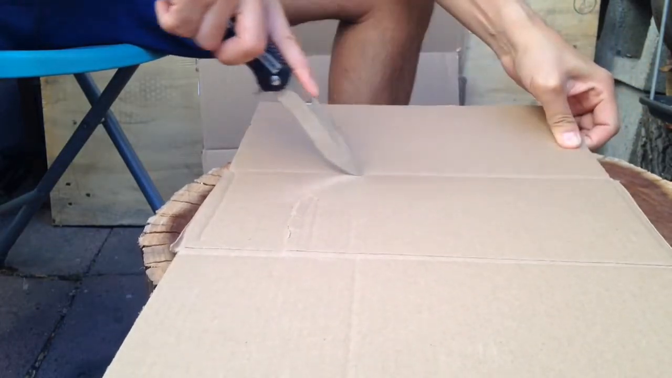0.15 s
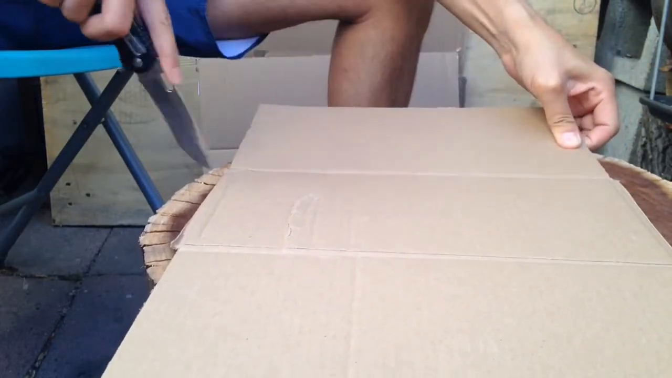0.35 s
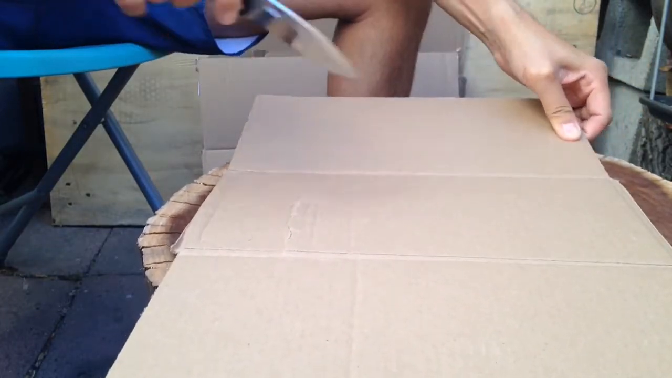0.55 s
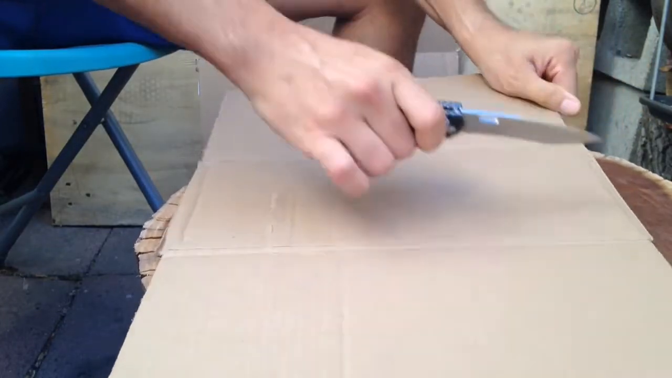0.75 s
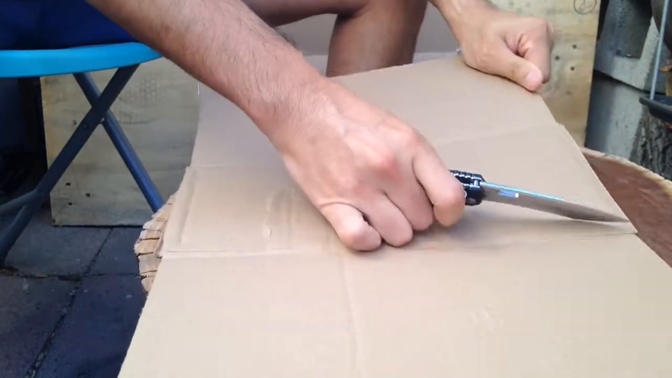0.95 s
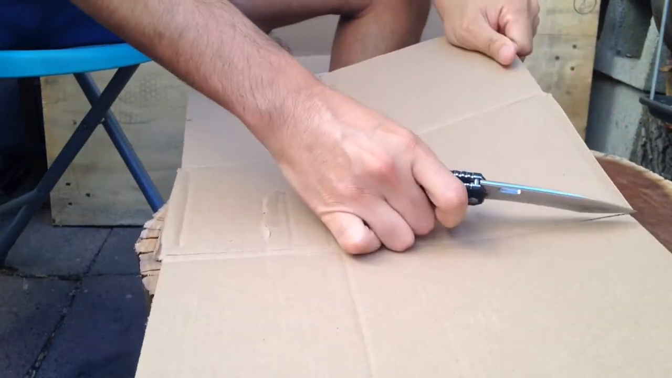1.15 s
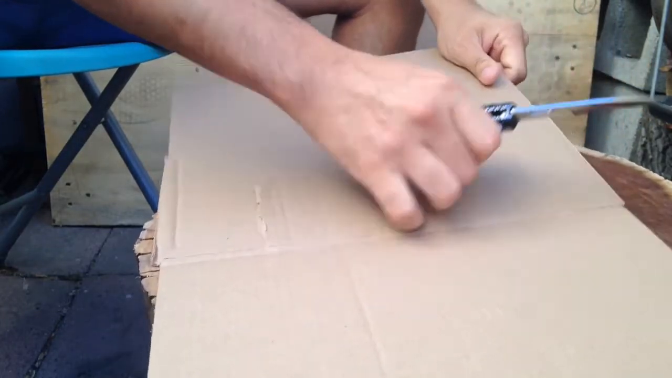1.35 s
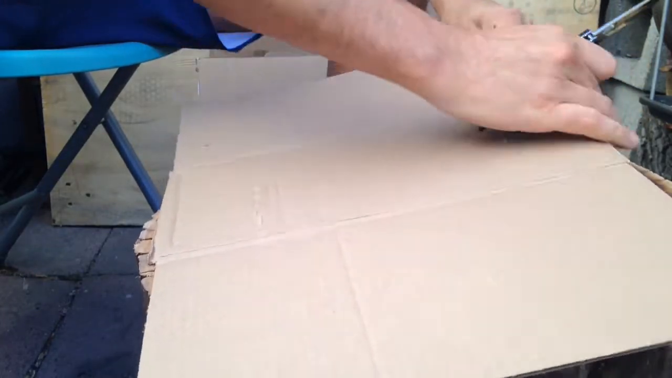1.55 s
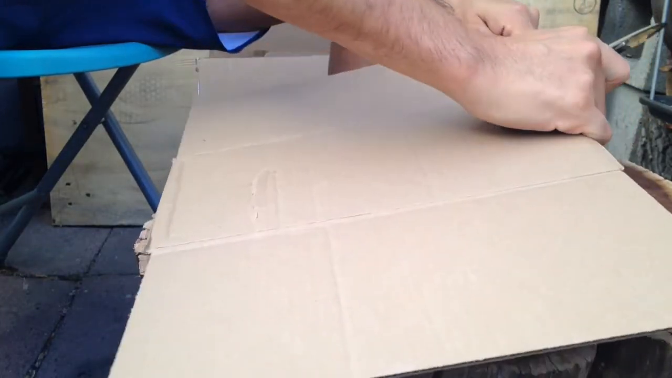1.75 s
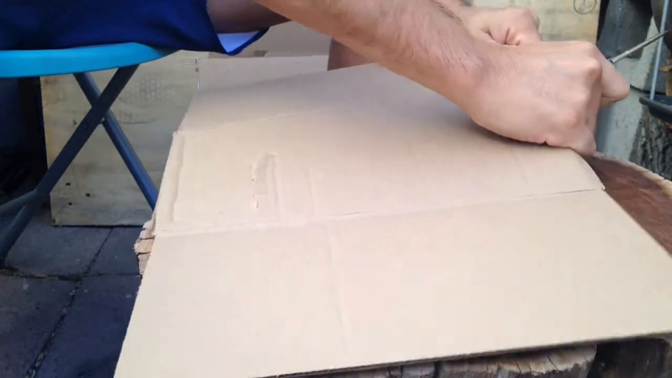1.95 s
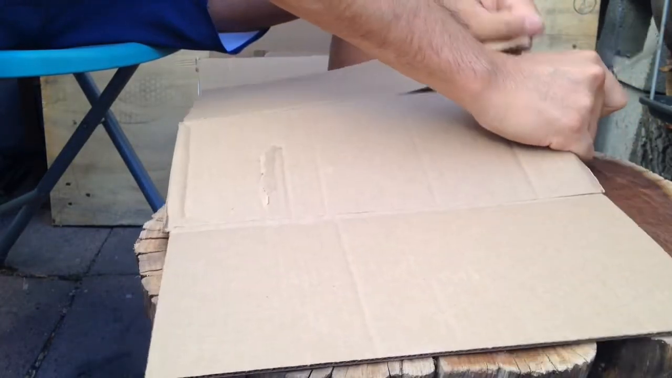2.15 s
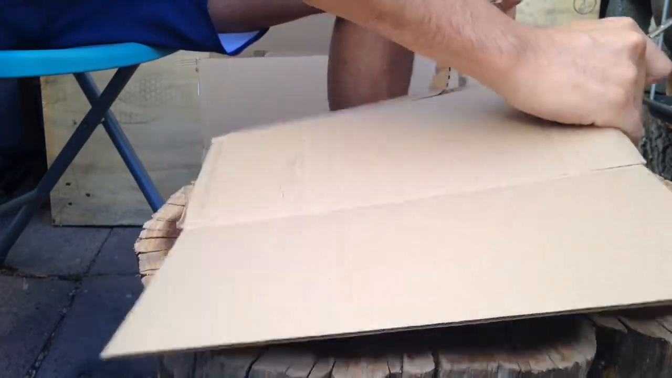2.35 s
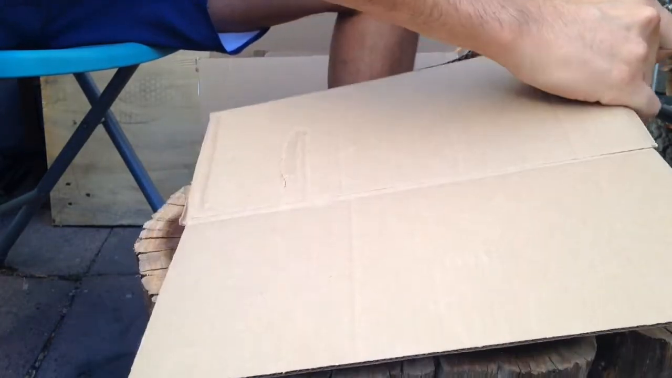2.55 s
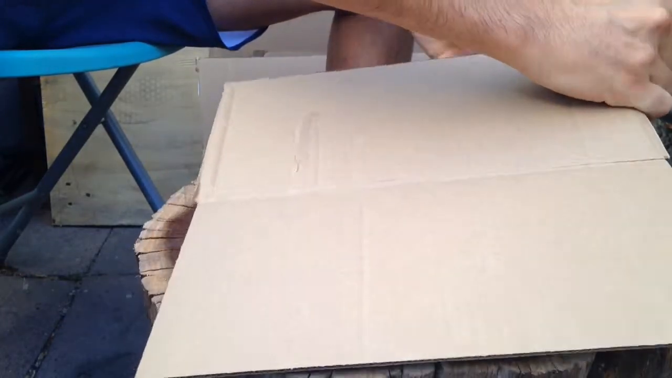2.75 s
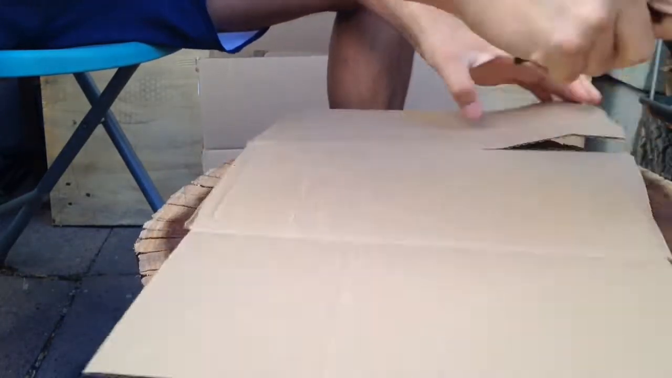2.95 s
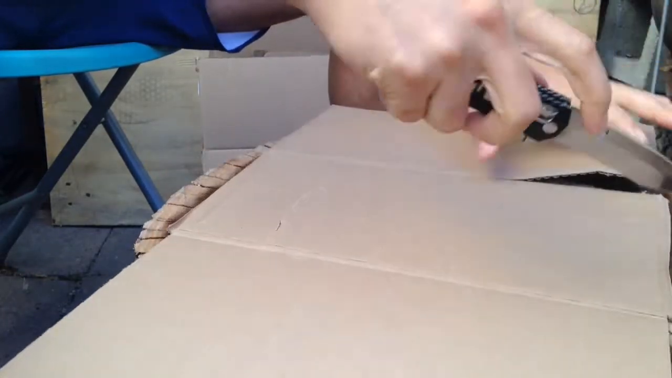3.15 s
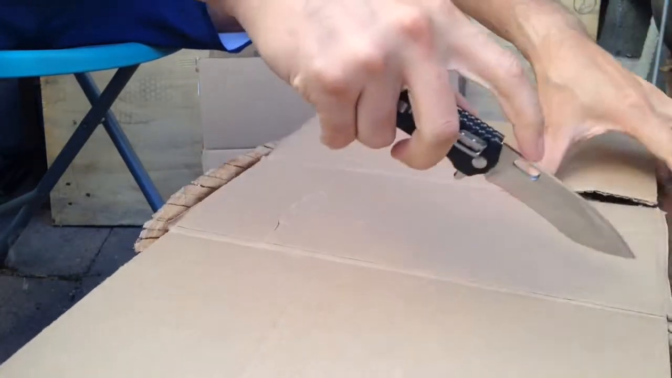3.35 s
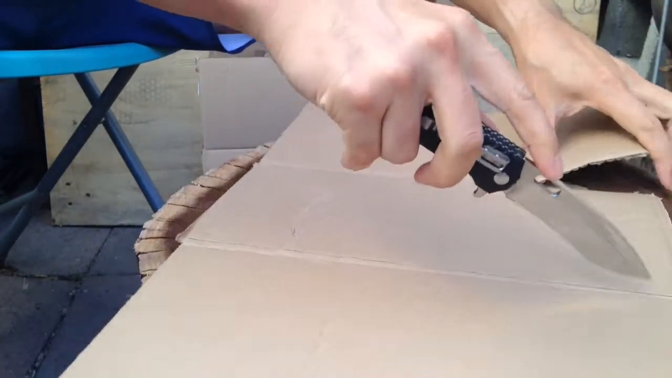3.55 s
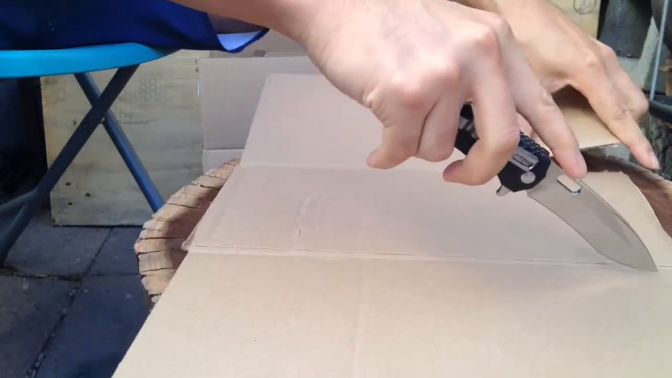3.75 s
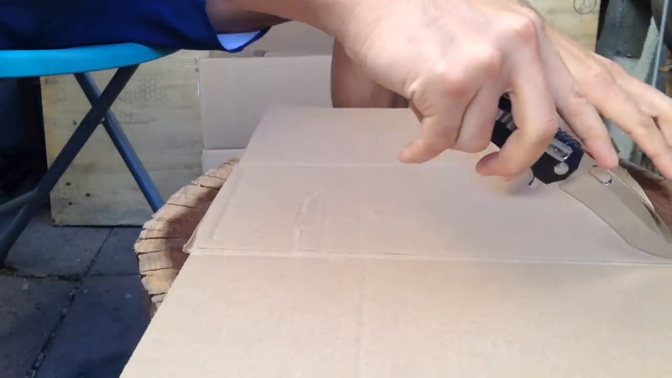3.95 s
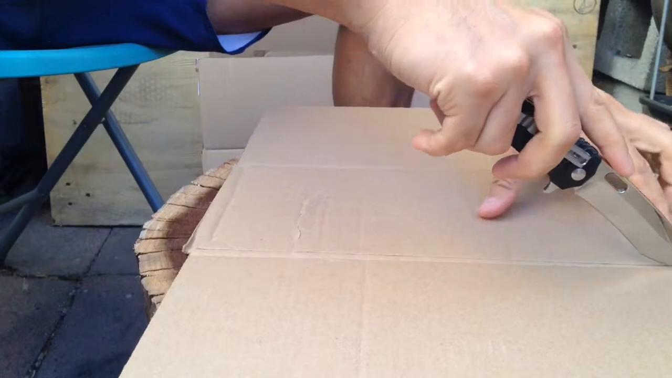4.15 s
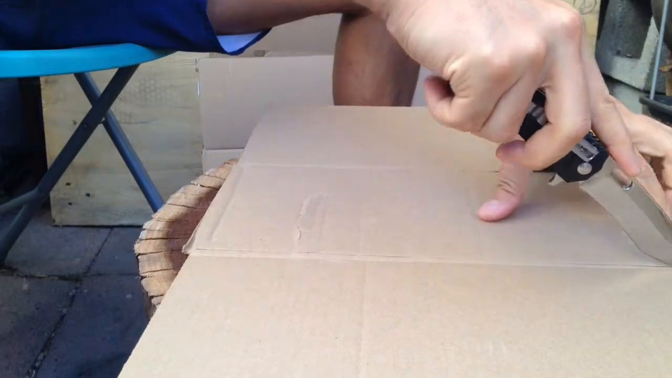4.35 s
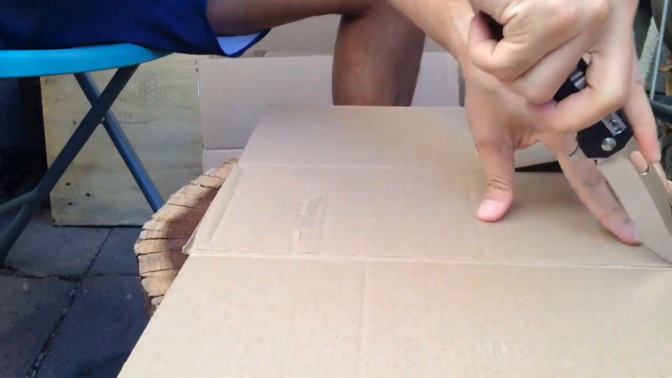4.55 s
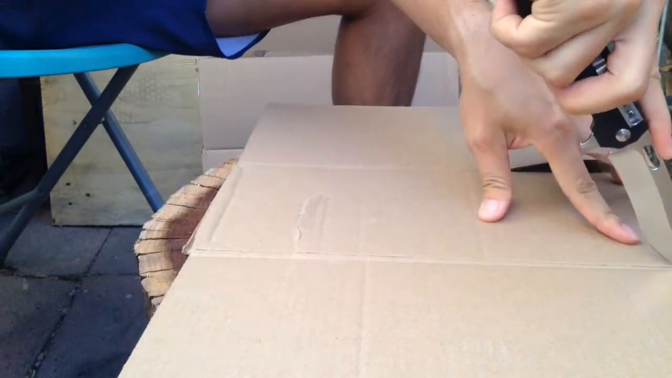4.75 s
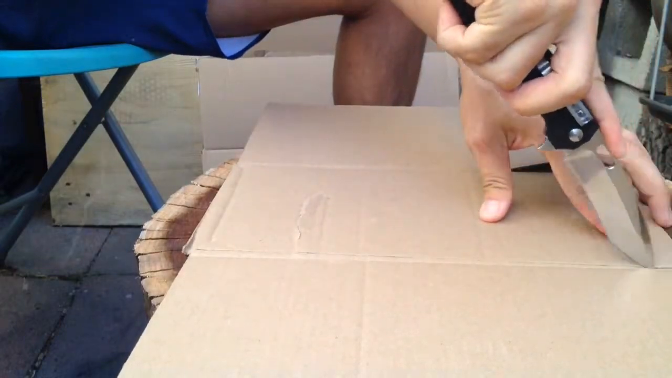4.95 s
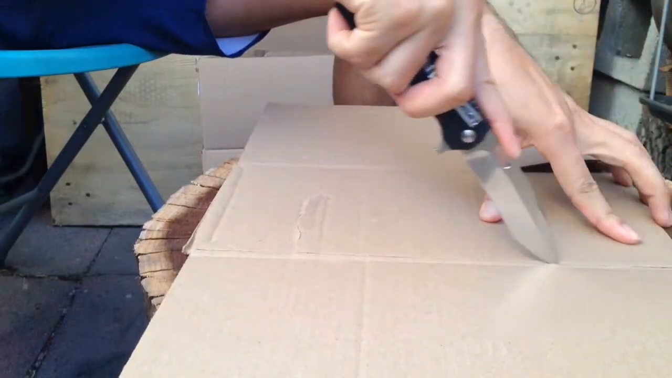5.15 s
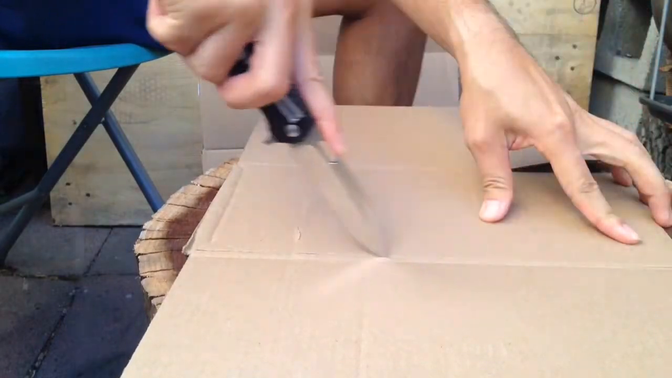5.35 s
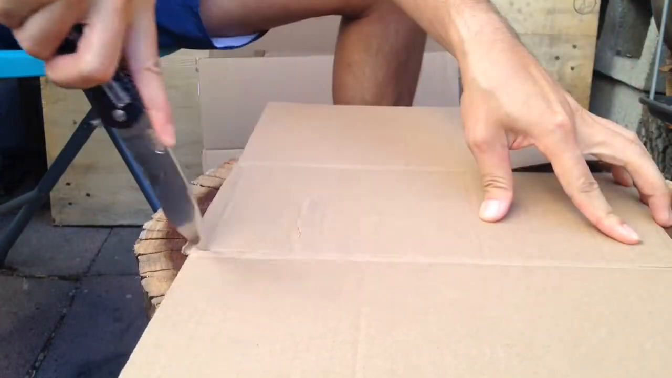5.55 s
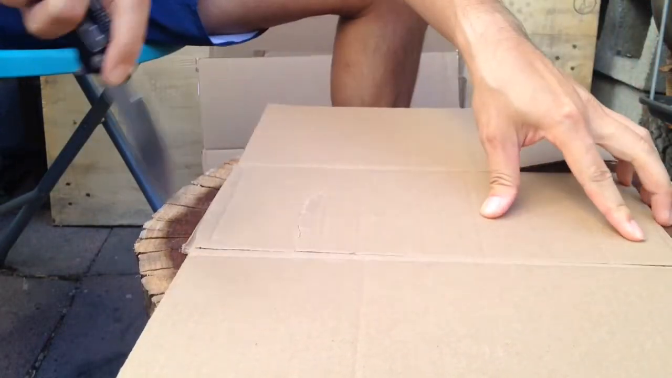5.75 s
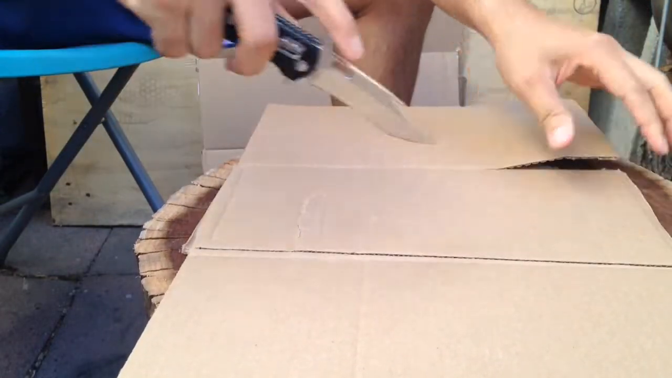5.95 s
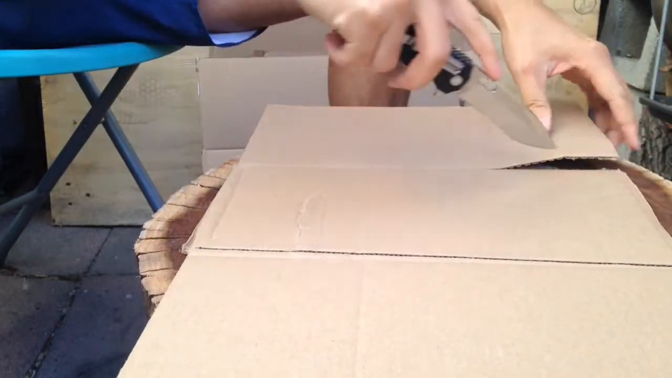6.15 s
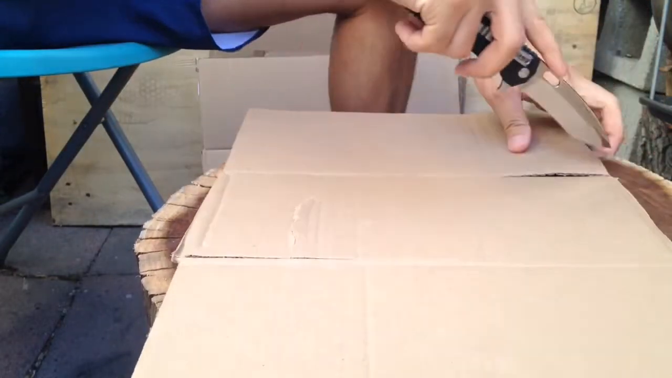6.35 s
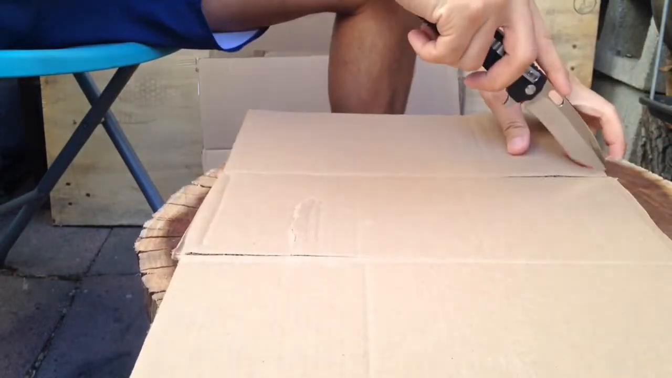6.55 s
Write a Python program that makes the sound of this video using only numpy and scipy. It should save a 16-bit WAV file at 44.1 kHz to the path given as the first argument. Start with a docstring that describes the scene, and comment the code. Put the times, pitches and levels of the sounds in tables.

```python
"""A knife scores a sheet of corrugated cardboard on a stump outdoors; hands bend, tear and shift the sheet.
Breaking fibres are random pulses that drive a coarse crackle, a fine fizz and the ringing modes of the sheet.
Snaps, knocks and sharp dry cracks stand out of the rubbing, and the sheet bumps on the stump with dull thuds.
Underneath, distant traffic is a low rumble of filtered noise that drifts in lumps."""
import sys
import numpy as np
from scipy import signal
from scipy.io import wavfile
from scipy.ndimage import uniform_filter1d

SR = 44100
rng = np.random.default_rng(int(sys.argv[2]) if len(sys.argv) > 2 else 0)


def wav_out(sig):
    """Save sig, one row per channel (or a flat mono array), as 16-bit PCM at SR to the path in sys.argv[1]."""
    wavfile.write(sys.argv[1], SR, np.round(np.clip(np.atleast_2d(sig).T, -1, 1) * 32767).astype(np.int16))


N = 295470

# resonant modes of the sheet: (frequency [Hz], bandwidth [Hz], relative level [dB])
BOARD = [(250, 100, 7.5), (349.4, 73, 3), (458, 81, 0), (673, 129, 2.5), (835, 158, 3.5), (1170, 300, 6.5),
         (1680, 57, 3.5)]
# modes favoured by the spot being rubbed: (time [s], centre frequency [Hz], spread [octaves])
SPOT = [(0, 600, .8), (.45, 660, .8), (2.3, 464, .7), (4.2, 400, .6), (5.1, 570, .4), (5.7, 530, .45),
        (6.28, 700, 1.1), (6.37, 870, .25)]


def gain_of(db):
    """Decibels to amplitude."""
    return 10 ** (np.asarray(db) / 20)


def evened(x):
    """Scales to rms 1."""
    return x / np.sqrt(np.mean(x ** 2) + 1e-20)


def slow_noise(span):
    """Noise smoothed twice over span samples, at rms 1: a random drift."""
    once = uniform_filter1d(rng.standard_normal(N), span)
    return evened(uniform_filter1d(once, span))


def causal(points, size=4096):
    """Minimum-phase response of unit energy, its spectrum drawn through (frequency [Hz], level [dB]) points."""
    f, db = np.transpose(points)
    hz = abs(np.fft.fftfreq(size, 1 / SR))
    level_db = np.interp(np.log(hz + 1), np.log(f + 1), db, left=-60, right=-60)
    log_gain = np.log(gain_of(level_db))
    # the Hilbert transform of the log gain gives the minimum phase
    spectrum = np.exp(np.conj(signal.hilbert(log_gain)))
    taps = np.fft.ifft(spectrum).real[:size // 2]
    return taps / np.linalg.norm(taps)


def cardboard():
    """Rubbing and snaps drive three answers: coarse crackle, fine fizz and the ringing sheet."""
    # colour of the crackle: (frequency [Hz], relative level per Hz [dB])
    crackle_colour = [(800, 3.5), (1700, 6.5), (2500, 4.5), (4000, 3.5), (5600, -4), (6800, -16),
                      (9000, -19.5)]
    # colour of the fizz: (frequency [Hz], relative level per Hz [dB])
    fizz_colour = [(2000, -58.5), (4800, -13.5), (7000, -14), (9300, -9.5), (11500, -12.5), (14700, -11.5),
                   (16000, -24)]
    snap_edge = 0.69  # 0-1: how much of a crack's low end is taken away

    coarse = fibres(per_s=1200, spread_db=4.0, clump_db=2.2, clump_s=.005, smooth=1.05)
    fine = fibres(per_s=5000, spread_db=4.5, clump_db=1.3, clump_s=.012, smooth=1.2)
    # the edge catches on the flutes
    catches = fibres(per_s=140, spread_db=2.5, clump_db=1.5, clump_s=0.031, smooth=0.97)
    fizz_gain, crackle_gain, shake_gain = rubbing()
    crack, spit, *thumps = snaps()

    # a sudden break is brighter than rubbing
    sharp = signal.lfilter([1, -snap_edge], [.5], crack)
    crackle = coarse * crackle_gain + sharp
    crackle = patches(crackle, ring_t60=.03, direct=1.4, patches_per_s=35, count=16)

    # coarse breaks throw fizz at the same moments
    spray = coarse * rng.choice([-1., 1.], N)
    fizz = evened(fine + 1.3 * spray) * fizz_gain + spit
    fizz = patches(fizz, ring_t60=.004, direct=2.4, patches_per_s=9, count=16)

    shaking = catches * shake_gain * favour(*rubbed_spot()) + thumps
    bright = signal.oaconvolve(crackle, causal(crackle_colour)) + signal.oaconvolve(fizz, causal(fizz_colour))
    return bright[:N] + board(shaking) + cracks() + bumps()


def rubbing():
    """Gains of fizz, crackle and shaking: each slide grips, swells or fades, and lets go; the cuts add theirs."""
    # the two long knife cuts, one list each: (time [s], fizz of fine fibres [dB],
    # crackle of coarse fibres [dB], shaking of the board [dB])
    cuts = [
        [(0.0, -38.5, -43, -45), (0.242, -35, -41, -41), (0.266, -39.5, -43, -35.5), (0.334, -29.5, -30, -28.5),
         (0.386, -42.5, -48.5, -41), (0.396, -36.5, -38.5, -32), (0.425, -60, -52, -32.5),
         (0.5, -105, -98, -85)],
        [(4.92, -77, -93, -69), (4.962, -49.5, -64.5, -58.5), (5.244, -47, -46.5, -43.5),
         (5.264, -44, -46, -37), (5.518, -36, -35, -34.5), (5.626, -41, -40, -32.5), (5.712, -50.5, -44, -39),
         (5.79, -99, -94, -72)],
    ]
    # hands and blade slide, bend and tear: (start [s], length [s], swell from start to end [dB],
    # fizz at the start [dB], crackle at the start [dB], shaking at the start [dB])
    slides = [(0.432, 5.05, 3, -72, -67.5, -63), (0.572, 0.14, 17.5, -64.5, -61, -67),
              (0.65, 0.2, -10, -43.5, -47.5, -69), (0.872, 0.061, 0.5, -45, -42.5, -35.5),
              (0.94, 0.57, -11, -58.5, -55, -58), (1.128, 0.037, -4, -50.5, -39, -47.5),
              (1.178, 0.085, -4, -55, -53.5, -57), (1.328, 0.091, -7.5, -47.5, -51.5, -57),
              (1.642, 0.083, 5.5, -55.5, -59.5, -55.5), (1.694, 0.031, 8.5, -51.5, -46.5, -55),
              (1.771, 0.13, 5, -51, -51, -53), (1.952, 0.083, 2, -38.5, -40, -39.5),
              (2.064, 0.16, 4, -53, -51.5, -51), (2.241, 0.1, -7, -30.5, -32, -28),
              (2.373, 0.058, -1.5, -40, -40.5, -60), (2.504, 0.095, -6, -61.5, -61.5, -82),
              (2.755, 0.074, 6.5, -56, -54, -45), (2.945, 0.051, 8.5, -52, -50, -39.5),
              (3.023, 0.011, 5, -40.5, -37, -42.5), (3.082, 0.067, -12.5, -40.5, -36, -34.5),
              (3.276, 0.17, -15, -51.5, -54.5, -44), (3.431, 0.17, 3.5, -47.5, -47, -47),
              (3.666, 0.2, -22.5, -39.5, -42, -42.5), (4.285, 0.029, -5, -57, -63, -47),
              (4.408, 0.039, 2, -65, -84, -55), (4.135, 1.5, 0, -77, -66, -74),
              (4.832, 0.0057, 4.5, -54.5, -67, -57), (5.796, 0.13, 15, -69.5, -72, -83),
              (6.283, 0.099, 5.5, -44, -43.5, -40.5)]
    grip_db_per_s, release_db_per_s = 950, 545.5  # rise ahead of the start, fall after the end
    swell_bend = 1.83  # above 1: the swell or fade comes late in the slide

    t = np.arange(0, N / SR + .002, .001)
    start, length, swell_db, *levels_db = np.transpose(slides)[:, :, None]
    into = t - start
    swelling = swell_db * np.clip(into / length, 0, 1) ** swell_bend
    gripping = grip_db_per_s * np.minimum(into, 0)
    releasing = -release_db_per_s * np.maximum(into - length, 0)
    shape_db = swelling + gripping + releasing
    # overlapping slides add in power
    gains = np.sqrt([np.sum(gain_of(db + shape_db) ** 2, axis=0) for db in levels_db])
    for s, *cut_db in map(np.transpose, cuts):
        gains = gains + [gain_of(np.interp(t, s, db, left=-120, right=-120)) for db in cut_db]
    return [np.interp(np.arange(N) / SR, t, gain) for gain in gains]


def fibres(per_s, spread_db, clump_db, clump_s, smooth):
    """Fibres break at random with uneven strength, in clumps as the edge sticks and slips, over smooth sliding."""
    breaks = rng.random(N) < per_s / SR
    strength = gain_of(spread_db * np.minimum(rng.exponential(1, N), 4))
    pulses = breaks * strength * rng.choice([-1., 1.], N)
    clumps = slow_noise(max(int(clump_s * SR), 2))
    drive = evened(pulses) + smooth * rng.standard_normal(N)
    return evened(drive * gain_of(clump_db * clumps))


def snaps():
    """Each snap or knock is a tick and a dying burst of breaks; rows: crackle, fizz, then one for each mode."""
    # fibres snap: (time [s], crack [dB], fizz [dB], t60 of crack and fizz [s])
    snap_rows = [(0.088, -34, -33, 0.048), (0.191, -30.5, -34, 0.088), (0.247, -29, -29, 0.066),
                 (0.7675, -37.5, -32, 0.057), (0.795, -34, -30.5, 0.014), (1.715, -38, -33.5, 0.05),
                 (1.837, -39, -35.5, 0.032), (2.2152, -13.5, -18.5, 0.037), (2.2226, -23, -23, 0.026),
                 (2.2286, -13.5, -17.5, 0.071), (2.298, -21.5, -25.5, 0.11), (2.3093, -24.5, -26, 0.05),
                 (2.35, -29, -33.5, 0.035), (3.047, -31, -42, 0.015), (4.0233, -49, -39, 0.012),
                 (4.0354, -66, -54, 0.01), (4.0436, -65, -59, 0.01), (4.074, -51, -57, 0.016),
                 (4.109, -58, -56, 0.012), (4.146, -55, -48, 0.025), (4.583, -55, -54, 0.018),
                 (5.0778, -38, -41.5, 0.067), (5.115, -34.5, -42, 0.034), (5.2061, -31, -30.5, 0.017),
                 (5.3972, -23, -28.5, 0.018), (5.4252, -29, -34, 0.038), (5.44, -31.5, -26.5, 0.03),
                 (5.5163, -40, -39, 0.021), (5.536, -41, -36, 0.018), (5.557, -31, -27, 0.035),
                 (5.642, -31, -32, 0.024), (5.672, -29, -33, 0.019), (6.479, -47, -45.5, 0.021)]
    # knocks on the sheet: (time [s], thump in the board [dB], crack [dB], t60 of the thump's drive [s],
    # modes favoured by the spot struck [Hz], their spread [octaves])
    knock_rows = [(0.395, -34, -32, 0.048, 647, 0.2), (0.8701, -30.5, -53, 0.032, 470, 1.23),
                  (0.915, -24.5, -35.5, 0.11, 570, 1.6), (1.039, -40.5, -45.5, 0.035, 530, 1.1),
                  (1.6902, -37.5, -59, 0.39, 880, 0.58), (1.962, -28.5, -35.5, 0.08, 910, 1.8),
                  (2.6934, -39.5, -57, 0.055, 366, 0.54), (2.7955, -27, -44, 0.2, 463, 0.79),
                  (2.9116, -34.5, -52, 0.48, 647, 0.34), (2.968, -21, -30.5, 0.041, 385, 0.39),
                  (3.272, -37.5, -49, 0.35, 664, 0.95), (3.2973, -22, -25, 0.12, 600, 0.95),
                  (3.4384, -27, -35, 0.073, 530, 1.16), (3.9428, -23, -36.5, 0.16, 634, 2.7),
                  (5.248, -31.5, -28.5, 0.044, 520, 0.44), (5.2814, -35.5, -53, 0.043, 530, 0.42),
                  (5.466, -33.5, -48, 0.025, 516, 0.56), (5.5795, -30, -27, 0.039, 493, 0.3),
                  (5.6161, -27.5, -31, 0.11, 520, 0.5), (5.705, -32, -35.5, 0.14, 1070, 0.88),
                  (6.428, -44, -46, 0.023, 785, 1.6)]
    snap_thump_db, knock_fizz_db = -12.5, -11.5  # both relative to the crack
    snap_octaves = 0.69  # spread of the modes that a snap shakes
    bright_share = 0.61  # crack and fizz die in this share of the thump's t60
    blow = 6.  # first blow of a thump over the first tick of the crack

    hits = []
    for s, crack_db, fizz_db, t60 in snap_rows:
        spot_hz = np.interp(s, *np.transpose(SPOT)[:2])
        hits.append((s, crack_db, crack_db + snap_thump_db, fizz_db, t60 / bright_share, spot_hz, snap_octaves))
    for s, thump_db, crack_db, *rest in knock_rows:
        hits.append((s, crack_db, thump_db, crack_db + knock_fizz_db, *rest))

    out, t = np.zeros((2 + len(BOARD), N)), np.arange(6000) / SR
    bursts = rng.standard_normal((len(hits), len(t)))
    bursts[:, 0] = 3.  # the tick
    # the drive of higher modes dies sooner; the third mode keeps the t60 as given
    hurry = np.sqrt(np.array(BOARD)[:, :1] / BOARD[2][0])
    for (s, crack_db, thump_db, fizz_db, t60, spot_hz, octaves), burst in zip(hits, bursts):
        fade_db = -60 * t / max(t60, .005)
        bright = gain_of([[crack_db], [fizz_db]]) * gain_of(fade_db / bright_share)
        thump = favour(spot_hz, octaves) * gain_of(thump_db + hurry * fade_db)
        thump[:, 0] *= blow
        part = out[:, round(s * SR):][:, :len(t)]
        part += (np.r_[bright, thump] * burst)[:, :part.shape[1]]
    return out


def patches(drive, ring_t60, direct, patches_per_s, count):
    """Each patch of the sheet rings in its own many small modes; the contact wanders over the patches."""
    t = np.arange(3000) / SR
    # noise that dies away stands for a crowd of small modes
    rings = rng.standard_normal((count, len(t))) * gain_of(-60 * t / ring_t60)
    rings /= np.linalg.norm(rings, axis=1, keepdims=True)
    rings[:, 0] += direct
    place = patches_per_s * np.arange(N) / SR
    out = np.zeros(N)
    for k, ring in enumerate(rings):
        # distance round the circle of patches, for an equal-power crossfade
        away = np.minimum(abs((place - k + count / 2) % count - count / 2), 1)
        touch = drive * np.cos(np.pi / 2 * away)
        out += signal.oaconvolve(touch, ring / np.linalg.norm(ring))[:N]
    return out


def rubbed_spot():
    """Favoured frequency [Hz] and spread [octaves] of the rubbed spot, which strays about its path."""
    wander_octaves, wander_s = .09, .03
    s, *spot = np.transpose(SPOT)
    spot_hz, octaves = (np.interp(np.arange(N) / SR, s, column) for column in spot)
    stray = slow_noise(int(wander_s * SR))
    return spot_hz * 2 ** (wander_octaves * stray), octaves


def favour(hz, octaves):
    """Share of a jolt that each mode takes: most for those near hz, neighbours in opposite phase; unit power."""
    far_share = .16  # left to distant modes
    modes = np.array(BOARD)
    distance = np.log2(modes[:, :1] / np.atleast_1d(hz)) / octaves
    share = gain_of(modes[:, 2:]) * (far_share + np.exp(-distance ** 2))
    share *= (-1) ** np.arange(len(modes))[:, None]
    return share / np.linalg.norm(share, axis=0)


def board(jolts):
    """Every mode of the sheet rings as a decaying sine from its own row of jolts."""
    t = np.arange(4096) / SR
    rings = np.array([np.exp(-np.pi * width * t) * np.sin(2 * np.pi * hz * t) for hz, width, _ in BOARD])
    rings /= np.linalg.norm(rings, axis=1, keepdims=True)
    return signal.oaconvolve(jolts, rings, axes=1)[:, :N].sum(axis=0)


def cracks():
    """Single dry cracks as a fold gives way: each a fast push of pressure and a slower pull back."""
    # (time [s], level [dB], time constant of the push [ms])
    crack_rows = [(.8716, -20, .06), (.8988, -24, .04), (.9133, -6, .065), (2.9674, -17, .09),
                  (3.2972, -8, .06), (3.4378, -15, .09), (3.9431, -10, .12), (3.951, -14, .16),
                  (3.9702, -23, .3), (5.2492, -20, .03), (.2062, -20, .03)]
    out = np.zeros(N)
    for s, db, push_ms in crack_rows:
        u = np.arange(400) / SR / (push_ms / 1000)
        out[round(s * SR):][:len(u)] -= gain_of(db) * u ** 2 * (3 - u) * np.exp(.5 - u)
    return out


def bumps():
    """The whole sheet bumps on the stump: dull low thuds, each a decaying sine with a softened start."""
    # (time [s], level [dB])
    bump_rows = [(0.84, -28), (1.874, -29.5), (2.214, -28), (2.301, -28.5), (3.942, -24.5)]
    stump_hz, stump_t60, onset_s = 137.5, 0.17, 0.0014
    t = np.arange(8000) / SR
    thud = np.sin(2 * np.pi * stump_hz * t) * gain_of(-60 * t / stump_t60) * (1 - np.exp(-t / onset_s))
    impulses = np.zeros(N)
    for s, db in bump_rows:
        impulses[round(s * SR)] = gain_of(db)
    return signal.oaconvolve(impulses, thud)[:N]


def traffic():
    """Distant low rumble: noise through a dark filter, its level drifting in lumps."""
    # colour of the rumble: (frequency [Hz], relative level per Hz [dB])
    rumble_colour = [(25, -1.5), (101, -0.5), (260, -21), (341, -13.5), (524, -23.5), (1140, -24.5),
                     (1580, -33.5), (2860, -40.5), (14400, -53), (15600, -50)]
    # course of its loudness: (time [s], level [dB])
    loudness = [(0.0, -46.5), (1.75, -44), (6.7, -50)]
    lead = 8192  # samples that let the filter fill up
    noise = rng.standard_normal(N + lead)
    rumble = signal.oaconvolve(noise, causal(rumble_colour, size=16384))[lead:N + lead]
    lumps_db = 1.4 * slow_noise(3000)
    level_db = np.interp(np.arange(N) / SR, *np.transpose(loudness))
    return evened(rumble) * gain_of(lumps_db + level_db)


def scene():
    """The cardboard close by in the open air, over the traffic."""
    return (cardboard() + traffic())[None]


def record(dry):
    """The microphone loses the deepest bass; then the recorder's band limit."""
    edge_hz = 15600
    thin = signal.sosfilt(signal.butter(6, 36., "highpass", fs=SR, output="sos"), dry)
    band_limit = signal.firwin(511, edge_hz, window=("kaiser", 9), fs=SR)
    return signal.oaconvolve(thin, band_limit[None], "same")


dry = scene()
out = record(dry)
wav_out(out)
```